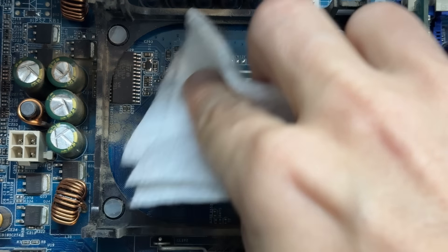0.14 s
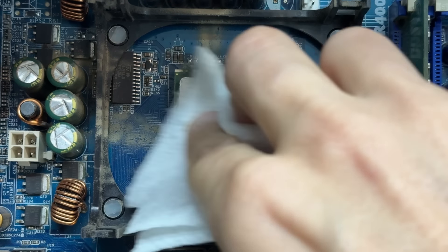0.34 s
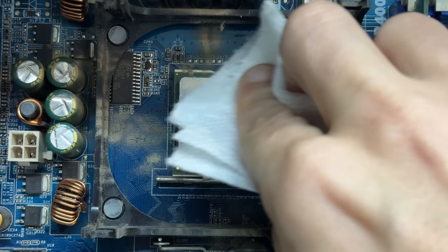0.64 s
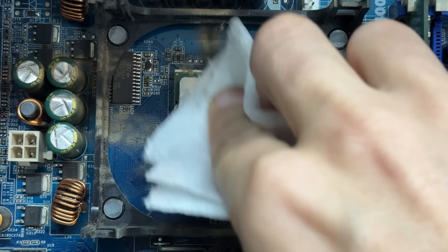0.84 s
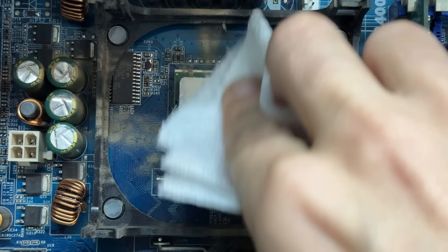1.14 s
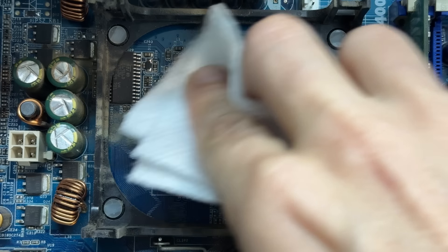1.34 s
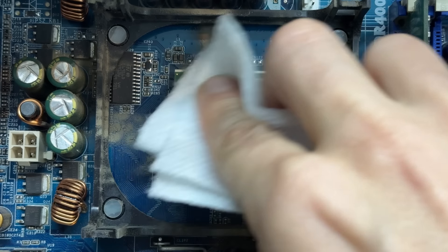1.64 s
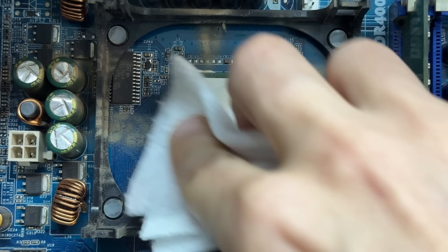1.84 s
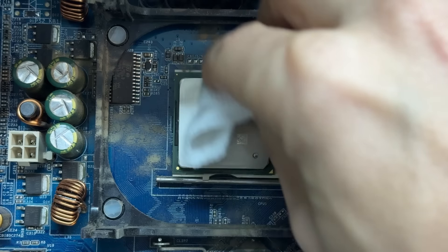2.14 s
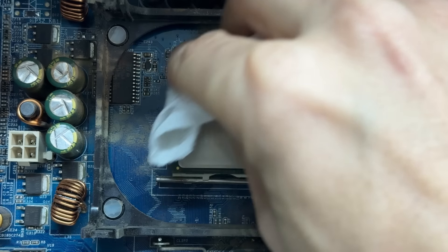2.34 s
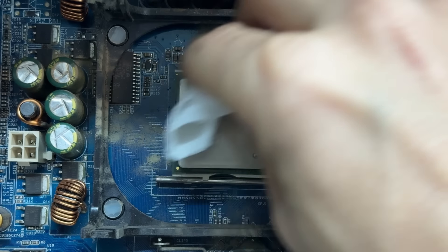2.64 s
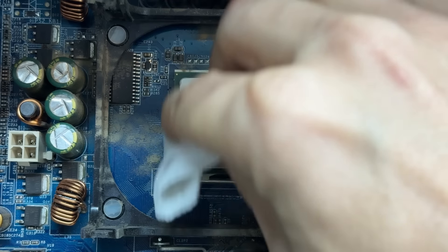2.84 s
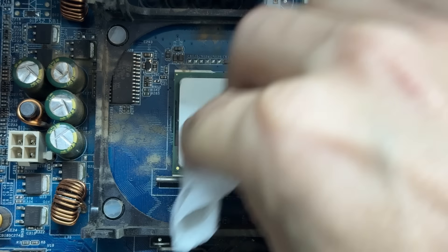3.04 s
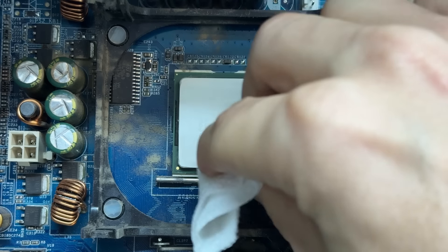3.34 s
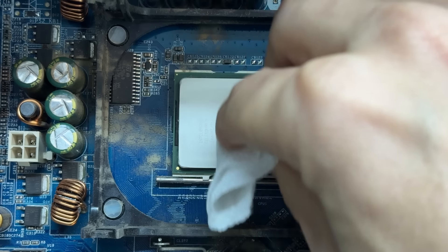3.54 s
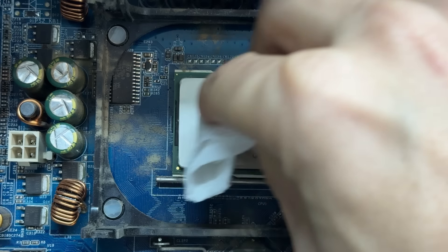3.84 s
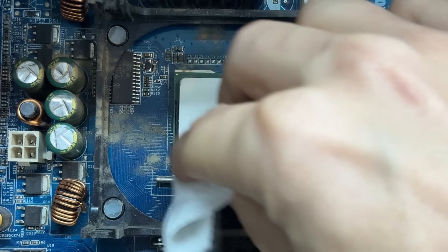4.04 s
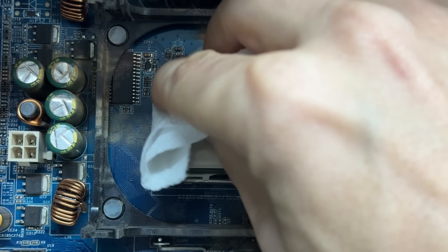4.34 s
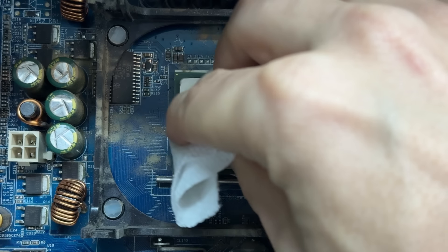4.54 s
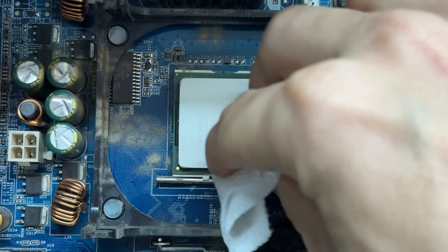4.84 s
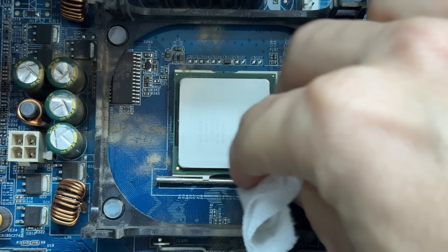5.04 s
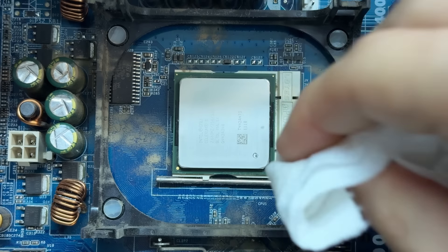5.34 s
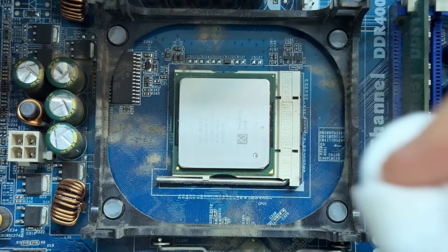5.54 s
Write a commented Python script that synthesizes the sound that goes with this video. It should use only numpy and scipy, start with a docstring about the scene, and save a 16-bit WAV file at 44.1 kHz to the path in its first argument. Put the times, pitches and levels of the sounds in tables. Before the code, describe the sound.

A hand scrubs a processor plate with a paper towel. Irregular swishes, crease snaps and soft thuds give way to lighter, more coloured rubbing with sharp clacks, a squeak and a thin lever ring. A last small flurry fades into soft room noise and low hum. Phone microphone just above, bumped by the strokes.

```python
"""A folded paper towel scrubs a small metal plate on a circuit board, just under a phone on a stand.
From the start its fibres hiss and grate, fingers tick and knock the board, and each push sways the stand.
Then creases snap and the paper squeaks; at 2.75 s the towel is bunched into a tube that colours the hiss.
Around 4 s a brushed latch lever rings as slowly fading sines; at 4.3 s the tube loosens.
The rubbing fades at the end; a quiet room of soft noise and two hums lies behind it all."""
import sys
import numpy as np
from scipy import signal
from scipy.fft import rfft, irfft
from scipy.io import wavfile
from scipy.ndimage import uniform_filter1d

SR = 44100
rng = np.random.default_rng(int(sys.argv[2]) if len(sys.argv) > 2 else 0)


def generate_wav(signal):
    """Clip the signal to [-1, 1] and save it as 16-bit WAV at the path in sys.argv[1]."""
    frames = np.transpose(np.atleast_2d(signal))
    scaled = np.clip(frames, -1, 1) * 32767
    pcm = np.round(scaled).astype(np.int16)
    wavfile.write(sys.argv[1], SR, pcm)


N = 250532
TIME = np.arange(N) / SR  # s

# light rubbing between strokes: start_s, hiss_db, fine_sheen_db, board_grating_db, desk_drag_db
LIGHT_RUBBING = [(0, -64.5, -63.5, -63.5, -63.5), (.6, -66.5, -67, -66.5, -59),
                 (.9, -66, -64.5, -65, -63.5), (1.9, -64.5, -66, -64.5, -61),
                 (2.4, -67.5, -62.5, -63.5, -65), (3.4, -74, -66.5, -66.5, -65.5),
                 (4.2, -69, -65.5, -63.5, -68.5), (4.45, -70.5, -67.5, -70, -62.5),
                 (4.8, -64, -63, -68, -79), (5.12, -63, -60.5, -59.5, -57.5),
                 (5.24, -70.5, -77, -65, -63.5), (5.46, -75, -73.5, -75, -64), (5.68, -81.5, -77, -83, -66)]
# firm strokes: peak_s, half_length_s, hiss_db, sheen_relative_to_hiss_db, board_grating_db
FIRM_STROKES = [(0.206, 0.031, -61, -15, -68), (0.506, 0.049, -50, -5, -54.5),
                (0.689, 0.027, -55, 1.5, -55.5), (1.304, 0.041, -58.5, -3.5, -48.5),
                (1.531, 0.024, -61, -7, -47), (1.556, 0.025, -52, -7, -40), (1.567, 0.024, -52, -7, -34.5),
                (1.595, 0.025, -53, -2, -42), (1.63, 0.018, -65, 0, -61), (1.676, 0.042, -63, 1, -53.5),
                (1.82, 0.04, -64, -10, -58.5), (2.004, 0.036, -59.5, -2, -77), (2.18, 0.012, -78, 2, -60),
                (2.322, 0.028, -73, -5, -59.5), (2.648, 0.052, -56.5, -3, -56.5),
                (2.824, 0.048, -77, 12, -69), (3.074, 0.035, -67, 6.5, -85), (3.123, 0.019, -65, -2, -63),
                (3.213, 0.022, -78, 3, -58), (3.313, 0.039, -61, -3, -59.5), (3.401, 0.054, -62, -5, -61.5),
                (3.454, 0.025, -76, -5, -61.5), (3.542, 0.027, -83, 8, -64), (3.616, 0.014, -62, -19, -63),
                (3.723, 0.041, -63.5, -22, -60), (4.045, 0.033, -57.5, -1, -54),
                (4.118, 0.044, -69, -4, -62.5), (4.446, 0.068, -67, -5, -62), (5.189, 0.018, -60, 5, -47),
                (5.327, 0.025, -64, 1, -55), (5.427, 0.02, -65.5, -3, -60.5)]
# the towel eases off the plate: middle_s, half_length_s, depth_db
EASINGS = [(0.635, 0.014, -10), (0.785, 0.031, -11), (1.994, 0.032, -14), (2.5, 0.019, -6),
           (3.077, 0.015, -27), (4.27, 0.079, -13)]
# bands of fibre noise, in order hiss, sheen, top edge: pitch_hz, width_hz (of each of two passes), level_db
FIBRE_BANDS = [(6330, 4800, -1.5), (11570, 4640, -3.5), (15500, 69000, -5.5)]
# resonances of the bunched towel: pitch_hz, width_hz (of each of two passes), level_db (before the lean)
TUBE_MODES = [(4450, 500, -16), (5300, 900, -8), (5950, 900, -2), (7000, 600, -11)]
# single resonances of the circuit board: pitch_hz, width_hz, relative_level_db
BOARD_MODES = [(365, 35, -15), (600, 30, -11), (657, 45, -7), (790, 30, -16), (901, 30, -8), (1130, 60, -8),
               (1255, 40, -6), (1530, 60, -10), (1644, 40, 3), (2015, 50, -13), (2375, 35, -11),
               (2470, 30, -9), (2590, 20, -2), (3753, 50, -11), (4520, 140, -10), (5420, 260, -18),
               (7690, 110, -18)]
# many close board resonances blurred together: pitch_hz, width_hz, relative_level_db
BOARD_BLUR = [(1130, 820, -5.5), (2396, 670, -6)]
# resonances of the desk: pitch_hz, width_hz, relative_level_db
DESK_MODES = [(185, 172, 0), (417, 192, -1), (576, 364, -6.5)]
# hard ticks on the board: start_s, peak_db, dullness_0_to_1, plate_pitch_hz, added_seat_level_db
HARD_TICKS = [(0.039, -40, 0.45, 1540, -1), (0.7846, -54, 1, 940, 8), (1.2202, -48, 0.5, 1060, 3),
              (1.664, -45, 0.6, 1070, -6), (1.708, -44, 0.6, 1170, -7), (1.819, -48, 0, 1550, -2),
              (1.841, -43, 0.6, 1500, -5), (2.059, -45, 0, 1940, 4), (2.1167, -59, 0.4, 1240, -4),
              (2.132, -48, 0.3, 1520, 2), (2.1617, -45, 0.26, 2190, -6), (2.1623, -45.5, 0.37, 1110, 0),
              (2.5203, -48, 0.5, 1520, 6), (2.83, -34, 0.32, 1523, 1), (3.0984, -35, 0.34, 1516, 2),
              (3.205, -49, 0.1, 1100, -6), (3.4492, -51, 0, 1230, -4), (3.8513, -46, 0.1, 1600, 0),
              (4.4479, -48.5, 0.43, 1630, 1), (4.66, -44, 0.02, 1590, -3), (5.0155, -52, 0.2, 2200, -12),
              (5.1843, -54, 0.3, 1640, -2), (5.196, -48.5, .8, 1130, 12), (5.4193, -56, 0, 1280, 17)]
# the plate in its socket, in order low, seat, plate, top: pitch_hz, width_hz, relative_level_db
# (each tick brings its own plate pitch and adds to the seat level)
PLATE_MODES = [(364, 43, -16), (587, 28.5, 3), (1536, 68, 12), (2840, 570, 1.5)]
# soft knocks of the board on the desk, and a thin 786 Hz ring at 4.66 s:
# start_s, peak_db (of the whole knock), pitch_hz, width_hz, undertone_db, board_buzz_db
KNOCKS_AND_RING = [(0.281, -44.5, 191, 14, 10, -12), (0.528, -42, 303, 160, 18, 1),
                   (0.999, -44, 382, 45, -17, -10), (1.200, -40.5, 328, 86, -6.5, -22),
                   (1.454, -34, 337, 68, 3, -18), (1.741, -40, 314, 81, -1.5, -13),
                   (2.060, -36.5, 328, 54, 4.5, -21), (2.162, -41, 572, 58, -9, -17),
                   (4.66, -59.5, 786, 8, -20, -20), (5.319, -42, 436, 35, -15, -6),
                   (5.328, -46, 390, 18, -16, -21), (5.441, -50.5, 405, 40, -23, -24)]
# higher resonances of a knock: ratio_to_knock_pitch, width_hz, relative_level_db
KNOCK_OVERTONES = [(1.55, 41.3, -20.5), (2.35, 45, -31)]
# paper creases that snap: start_s, peak_db, high_band_relative_to_low_band_db
CREASE_SNAPS = [(1.293, -47, -1), (1.455, -46.5, -7), (1.519, -42, -5), (1.560, -36, -13),
                (1.587, -36.5, -7), (1.821, -54, 0), (2.158, -48, 10), (3.206, -54, -5), (3.221, -52, -6),
                (3.699, -49, 2), (3.712, -47, 2), (4.057, -37, -12), (4.659, -47, 0), (5.185, -41, -3),
                (5.197, -42.5, -13), (5.317, -46, -13)]
# brief squeaks and rustles, the rough start of the lever's ring (1560 Hz at 4.018 s)
# and the low tail of the knock at 5.32 s (440 Hz): start_s, peak_db, pitch_hz, width_hz, length_s
NOISE_SWELLS = [(1.668, -50, 4660, 150, 0.0058), (1.67, -48.5, 4800, 120, 0.0083),
                (3.667, -57.5, 7630, 151, 0.038), (4.015, -49, 7550, 150, 0.056),
                (4.021, -55, 2230, 200, 0.022), (4.066, -56, 2180, 300, 0.058),
                (4.132, -52.5, 2230, 259, 0.055), (4.018, -51.5, 1560, 70, 0.054),
                (5.31, -52, 14700, 2000, 0.05), (5.346, -52, 440, 110, 0.037), (5.5, -62, 5500, 403, 0.03)]
# the lever is brushed: start_s, then level_db of each of its modes before they fade
LEVER_BRUSHES = [(3.68, -67, -77, -90, -90, -90), (4.022, -80, -62, -90, -90, -90),
                 (4.06, -57, -80, -68, -64, -72)]
# lever modes and their beating twins: pitch_hz, time_to_fade_60_db_s, twin_offset_hz, twin_size_ratio
LEVER_MODES = [(1411, .8, 5, .8), (1540, 1.5, -9, 2), (1630, .8, 7, .6), (10296, 1.9, 7, -.6),
               (11060, 2.2, 6, 1.5)]
# strokes that rock the stand: middle_s, peak_db, half_length_s
STAND_PUSHES = [(0.085, -13.5, 0.037), (0.339, -11.5, 0.046), (0.632, -16, 0.051), (0.993, -17, 0.033),
                (1.22, -11, 0.032), (1.508, -8, 0.027), (1.812, -8, 0.037), (2.105, -11, 0.036),
                (2.269, -13, 0.029), (2.518, -11, 0.033), (2.822, -13, 0.034), (3.081, -14, 0.04),
                (3.363, -18.5, 0.039), (4.031, -23.5, 0.038), (5.394, -31, 0.024)]
# the stand apart from the pushes: start_s, rumble_db (before the pushes boost it), idle_sway_db
STAND_LEVELS = [(0, -53, -29), (1.5, -41.5, -26.5), (2.1, -49, -30), (3.3, -51, -28.5), (3.6, -48, -34.5),
                (4.7, -50.5, -36.5), (5.3, -47.5, -35), (5.68, -39, -29.5)]
# colour of the stand's rumble: pitch_hz, relative_level_db (per Hz)
RUMBLE_COLOUR = [(15, -1), (25, 5), (40, -16), (57, -10), (75, -21.5), (130, -31), (200, -65.5)]
# colour of the room noise: pitch_hz, relative_level_db (per Hz)
ROOM_COLOUR = [(59, -42), (100, 5), (173, -1.5), (371, -2), (604, -3.5), (1000, -18.5), (1500, -10),
               (2600, -18), (8150, -49), (10500, -16.5), (15700, -87)]
# the upper hum rises and falls: start_s, level_db
UPPER_HUM = [(0, -60), (.6, -67), (.9, -56.5), (1.9, -55), (2.3, -66), (3.0, -64), (3.3, -82), (5.68, -73)]

STROKE_POINT, STROKE_FALL = 1.04, 0.87  # sharpness of the peak (2 = round); fall time / rise time
LIFT_SHARE, LIFT_EDGE = 0.77, 2.2  # share of the depth in board and desk; squareness of the gap
STROKE_DRAG_DB, DRAG_GROWTH = -76.5, 0.36  # drag when grating is at -50.5 dB; dB per dB of grating
KNOCK_TAIL_DB, KNOCK_TAIL_S = -11, 0.029  # the desk shudders after a knock
FOLD_S, FOLD_HISS_DB, FOLD_CLEAR = 2.75, -2, 0.5  # bunching: change in hiss, share of clear modes left
FOLD_BASS_DB = -2.5  # the lighter grip shakes the desk less
SLACK_S, SLACK_DB_PER_OCTAVE = 4.3, 16  # the tube loosens and leans to its lower resonances
UNDERTONE_RATIO = 0.552  # of the knock's pitch
LOW_HUM_HZ, HIGH_HUM_HZ = 57.5, 102.3
LOW_HUM_DB, ROOM_DB = -64.5, -70
BOUNCE_S, BOUNCE = 0.00017, 0.37  # delay and gain of the reflection
TOP_HZ = 15750


def undb(db):
    """Gain of a level in dB."""
    return 10 ** (np.asarray(db) / 20)


def unit(x):
    """Scales a sound to an average (rms) strength of 1."""
    return x / np.sqrt(np.mean(x ** 2))


def peak_one(x):
    """Scales a sound so that its peak is 1."""
    return x / np.abs(x).max()


def curves(table):
    """Draws straight lines between table rows: one curve for each column after the time."""
    s, *columns = np.transpose(table)
    return [np.interp(TIME, s, column) for column in columns]


def ring(x, hz, width_hz):
    """One resonance: an impulse sets off a sine that decays from height 1, sooner if the width is large."""
    r, w = np.exp(-np.pi * width_hz / SR), 2 * np.pi * hz / SR
    return signal.lfilter([0, r * np.sin(w)], [1, -2 * r * np.cos(w), r * r], x)


def body(x, modes):
    """An object's resonances added up at their relative levels, neighbours in opposite sense."""
    total = 0
    for k, (hz, width_hz, db) in enumerate(modes):
        # the width factor makes a level mean the height of the resonance
        total = total + (-1) ** k * undb(db) * width_hz * ring(x, hz, width_hz)
    return total


def band(x, mode):
    """Passes a sound twice through one resonance and scales it to rms 1."""
    return unit(body(body(x, [mode]), [mode]))


def colour(x, points):
    """Shapes a sound's spectrum through (Hz, dB) points and scales it to rms 1."""
    hz, db = np.transpose(points)
    f = np.maximum(np.fft.rfftfreq(len(x), 1 / SR), 1)
    gain = undb(np.interp(np.log(f), np.log(hz), db, left=-90))
    return unit(irfft(rfft(x) * gain, len(x)))


def walk(rate_hz):
    """A random wander of rms 1 that heads for a new level rate_hz times a second."""
    k = int(SR / rate_hz)
    steps = np.repeat(rng.standard_normal(N // k + 1), k)
    return unit(uniform_filter1d(steps, k)[:N])


def grit(scatter_db):
    """Dense slips of fibres: many small, a few large."""
    size_db = np.minimum(scatter_db * rng.exponential(size=N), 18)
    return unit(rng.standard_normal(N) * undb(size_db))


def add(out, s, sound):
    """Mixes a short sound in at time s."""
    i = int(s * SR)
    out[i:i + len(sound)] += sound[:N - i]


def towel():
    """Fibre slips sound as hiss in the air and drive the board (grating) and the desk (drag)."""
    hiss_db, sheen_db, grate_db, drag_db = effort()
    folded = TIME > FOLD_S
    patch_db = 1.03 * walk(25)  # the contact patch changes from moment to moment
    air = fibre_air(hiss_db, sheen_db, folded)
    return undb(patch_db) * (air + board_grating(grate_db, folded) + desk_drag(drag_db, folded))


def fibre_air(hiss_db, sheen_db, folded):
    """Wide bands of slip noise; once bunched, the towel's tube adds its own resonances."""
    hiss, sheen, edge = (undb(mode[2]) * band(grit(3.3), mode) for mode in FIBRE_BANDS)
    lean = SLACK_DB_PER_OCTAVE * (TIME > SLACK_S)
    tube = 0
    for mode in TUBE_MODES:
        octaves_down = np.log2(TUBE_MODES[1][0] / mode[0])
        level_db = mode[2] + lean * octaves_down + 2.5 * walk(7.2)
        tube = tube + undb(level_db) * band(grit(4.5), mode)
    broad = hiss * undb(2.0 * walk(21.99) + FOLD_HISS_DB * folded)
    air = undb(hiss_db) * (broad + folded * tube)
    air = air + (sheen + edge) * undb(sheen_db + 1.45 * walk(14))
    return air * undb(1.03 * walk(120))  # fibres catch and let go in small bursts


def board_grating(grate_db, folded):
    """Slips shake the board: single modes stand out of a blur of many close ones."""
    slips = grit(5.4)
    modes = 0
    for k, mode in enumerate(BOARD_MODES):
        # the thumb wanders over the plate, so each mode is driven more or less as it goes
        modes = modes + (-1) ** k * body(slips * undb(2.1 * walk(40)), [mode])
    # harder pressing lets the single modes stand out
    clear = np.clip(0.28 + 0.018 * (grate_db + 67.0), 0.1, 0.7) * np.where(folded, FOLD_CLEAR, 1)
    blur = unit(body(grit(4.5), BOARD_BLUR))
    mix = np.sqrt(clear) * unit(modes) + np.sqrt(1 - clear) * blur
    return mix * undb(grate_db + 2.5 * walk(70))


def desk_drag(drag_db, folded):
    """The same kind of slips, heard through the desk's low, broad resonances."""
    rub = grit(2.67)
    bass = body(rub, DESK_MODES[:1])
    rest = -body(rub, DESK_MODES[1:])  # minus keeps neighbours in opposite sense
    drag = (undb(FOLD_BASS_DB * folded) * bass + rest) / np.std(bass + rest)
    return drag * undb(drag_db + 2.77 * walk(15))


def effort():
    """Levels in dB of hiss, sheen, grating and drag: light rubbing, eased at times, plus strokes and knocks."""
    ease_db = sum(db * bump(s, half_s, point=LIFT_EDGE) for s, half_s, db in EASINGS)
    shares = np.array([[1], [1], [LIFT_SHARE], [LIFT_SHARE]])
    power = undb(np.array(curves(LIGHT_RUBBING)) + shares * ease_db) ** 2
    for s, half_s, hiss_db, sheen_db, grate_db in FIRM_STROKES:
        drag_db = STROKE_DRAG_DB + DRAG_GROWTH * (grate_db + 50.5)
        peaks = undb([[hiss_db], [hiss_db + sheen_db], [grate_db], [drag_db]])
        power = power + (peaks * bump(s, half_s, STROKE_FALL, STROKE_POINT)) ** 2
    for s, db, *_ in KNOCKS_AND_RING:
        tail = np.exp(-np.abs(TIME - s) / KNOCK_TAIL_S) * (TIME > s)
        power[3] += (undb(db + KNOCK_TAIL_DB) * tail) ** 2  # only the desk shudders
    return 10 * np.log10(power)


def bump(s, half_s, fall=1., point=1.5):
    """A swell of height 1 at time s; a larger point makes it squarer."""
    u = (TIME - s) / max(half_s, .005)
    return np.exp(-np.abs(np.where(u > 0, u / fall, u)) ** point)


def ticks():
    """A short push clacks the plate and rings the board; a duller tick is a longer push."""
    out, t = np.zeros(N), np.arange(4096) / SR
    low, seat, plate, top = PLATE_MODES
    for s, db, dull, hz, seat_db in HARD_TICKS:
        push = np.exp(-.5 * ((t - .0006) / (.00004 + 0.00025 * dull)) ** 2)
        rattle = undb(-61) * rng.standard_normal(len(t)) * np.exp(-t / 0.018)  # the plate settles
        ringing = body(push + rattle, BOARD_MODES)
        clack = body(push, [low, (*seat[:2], seat[2] + seat_db), (hz, *plate[1:]), top])
        sound = undb(-9.0) * peak_one(ringing) + peak_one(clack)
        add(out, s - .0006, undb(db) * peak_one(sound))
    return out


def knocks_and_ring():
    """A press and rebound gives a few dull cycles with board buzz on top; a narrow width gives a thin ring."""
    out, t = np.zeros(N), np.arange(9000) / SR
    push = np.gradient(np.exp(-.5 * ((t - .001) / 0.00034) ** 2))
    buzz = peak_one(body(push, BOARD_MODES))
    for s, db, hz, width_hz, under_db, buzz_db in KNOCKS_AND_RING:
        thud = ring(push, hz, width_hz) + undb(under_db) * ring(push, UNDERTONE_RATIO * hz, 29)
        for ratio, over_width_hz, over_db in KNOCK_OVERTONES:
            thud = thud + undb(over_db) * ring(push, ratio * hz, over_width_hz)
        sound = peak_one(thud) + undb(buzz_db) * buzz
        add(out, s - .001, undb(db) * peak_one(sound))
    return out


def snaps():
    """Snapping creases: bright noise bursts a few milliseconds long, in two fibre bands."""
    out, t = np.zeros(N), np.arange(800) / SR
    for s, db, bright_db in CREASE_SNAPS:
        burst = rng.standard_normal(len(t)) * (1 - np.exp(-t / 0.00065)) * np.exp(-t / 0.0049)
        low, high = (band(burst, mode) for mode in FIBRE_BANDS[:2])
        add(out, s, undb(db) * peak_one(low + undb(bright_db) * high))
    return out


def noise_swells():
    """Squeaks, rustles, the lever's rough start and a knock's low tail: noise narrowed by two resonances."""
    out, t = np.zeros(N), TIME[:int(.15 * SR)]
    for s, db, hz, width_hz, length_s in NOISE_SWELLS:
        swell = rng.standard_normal(len(t)) * np.exp(-4 * ((t - length_s / 2) / length_s) ** 2)
        sound = ring(ring(swell, hz, width_hz), hz, 2 * width_hz)
        add(out, s, undb(db) * peak_one(sound))
    return out


def lever():
    """The steel lever rings as thin, slowly fading sines, each beating with a shorter-lived twin."""
    out, t = np.zeros(N), TIME[:SR]
    for s, *levels_db in LEVER_BRUSHES:
        for (hz, t60_s, offset_hz, twin_size), db in zip(LEVER_MODES, levels_db):
            fade = (1 - np.exp(-t / 0.0012)) * undb(db - 60 * t / t60_s)
            twin = twin_size * undb(-150 * t / t60_s) * np.sin(2 * np.pi * (hz + offset_hz) * t)
            add(out, s, fade * (np.sin(2 * np.pi * hz * t) + twin))
    return out


def stand():
    """Each stroke leans the stand back, throws it forward and lets it swing out; it never rests."""
    rumble_db, sway_db = curves(STAND_LEVELS)
    shove, strain = 0, 0
    for s, db, half_s in STAND_PUSHES:
        u = (TIME - s) / half_s
        shove = shove + undb(db) * (1 - u ** 2) * np.exp(-u ** 2 / 2)
        strain = strain + undb(db) * np.exp(-(u + 0.5) ** 2 / 8.5)  # joints shudder as the load builds
    sway = unit(ring(ring(rng.standard_normal(N), 9.0, 8.6), 7.27, 8.2))
    rumble = colour(rng.standard_normal(N), RUMBLE_COLOUR) * undb(rumble_db + 1.5 * walk(3.1))
    return shove + undb(sway_db) * sway + rumble * (1 + 8.8 * strain)


def room():
    """Faint broad noise and two hums whose pitch and level waver."""
    low_hz = LOW_HUM_HZ + 0.73 * walk(3.0)
    high_hz = HIGH_HUM_HZ + 0.57 * walk(3.01)
    low = undb(LOW_HUM_DB + 1.0 * walk(3.3)) * np.sin(2 * np.pi * np.cumsum(low_hz) / SR)
    high_db = curves(UPPER_HUM)[0] + 2.4 * walk(5.91)
    high = undb(high_db) * np.sin(2 * np.pi * np.cumsum(high_hz) / SR)
    noise = undb(ROOM_DB + 1.5 * walk(4)) * colour(rng.standard_normal(N), ROOM_COLOUR)
    return noise + np.sqrt(2) * (low + high)  # the root makes hum levels rms


def scene():
    """Close sounds also arrive by a bounce off the board, which combs the treble."""
    near = towel() + ticks() + knocks_and_ring() + snaps() + noise_swells()
    bounce = np.interp(TIME - BOUNCE_S, TIME, near)
    close = (near + BOUNCE * bounce) / (1 + BOUNCE)
    return (close + lever() + stand() + room())[None]


def record(dry):
    """The phone cuts the top steeply."""
    low_pass = signal.ellip(10, .2, 60, TOP_HZ, fs=SR, output="sos")  # ripple and depth in dB
    return signal.sosfilt(low_pass, dry)


dry = scene()
out = record(dry)
generate_wav(out)
```